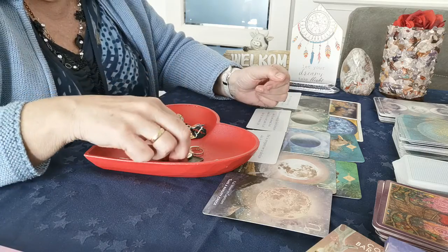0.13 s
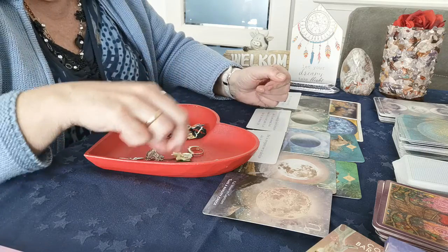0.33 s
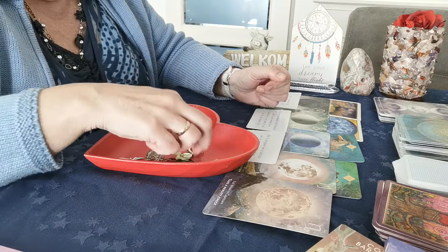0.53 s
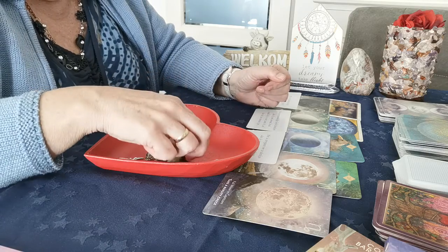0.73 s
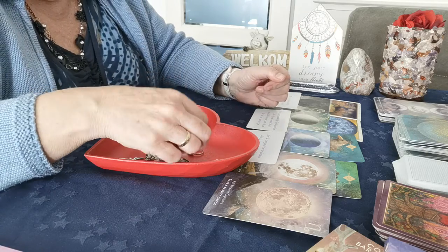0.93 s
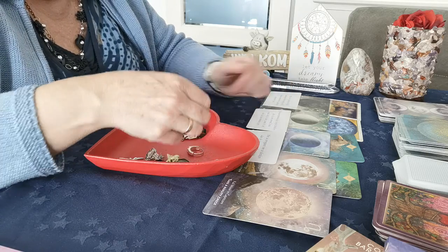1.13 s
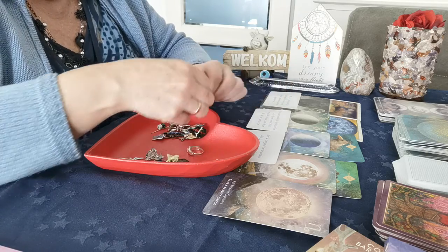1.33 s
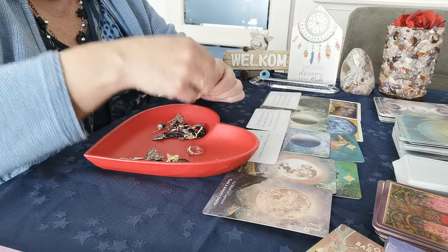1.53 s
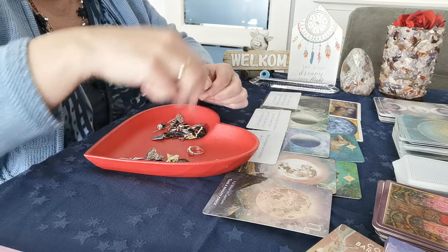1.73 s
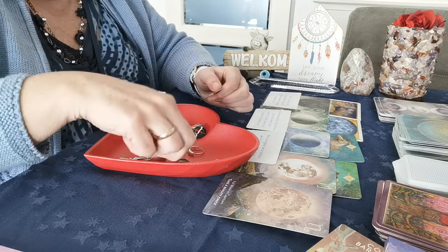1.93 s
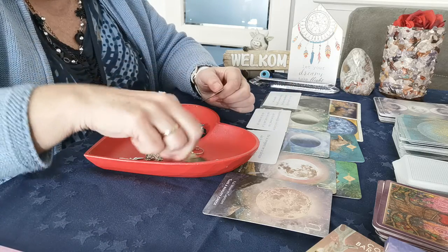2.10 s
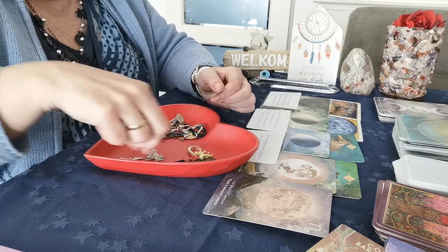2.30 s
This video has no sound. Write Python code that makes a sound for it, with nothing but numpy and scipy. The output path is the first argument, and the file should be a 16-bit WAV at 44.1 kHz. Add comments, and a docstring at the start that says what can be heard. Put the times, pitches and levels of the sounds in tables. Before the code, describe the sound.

Small metal charms clink and rattle in a shallow dish as fingers stir them, strongest around 0.2 to 0.4 seconds, with faint thuds from pressing the dish. Lighter clinks follow, ending in a brief ring at 1.2 seconds. A sleeve rubs softly around 1.5 seconds. From about 2.2 seconds the charms rattle again, louder. Quiet noise and a faint low hum fill the small room.

```python
"""Small metal charms clink and rattle as fingers stir them in a shallow dish on a cloth-covered table.
Each impact gives a damped knock on the dish, a crack of metal on metal and a brief ring of the charm's
modes; a push of the fingers sets off many impacts. The dish resonates and a small room reverberates.
Pressing on the dish makes soft thuds. The hand lifts away with a rub of the sleeve, then dips in again,
over quiet room noise and a low hum."""
import sys
import numpy as np
from scipy import signal
from scipy.fft import rfft, irfft
from scipy.io import wavfile

SR = 44100
rng = np.random.default_rng(int(sys.argv[2]) if len(sys.argv) > 2 else 0)


def to_wav(sig):
    """Store sig (one row per channel, or 1-D mono) as 16-bit WAV at the path in sys.argv[1].

    Samples outside -1..1 are clipped; the rate is SR.
    """
    pcm = np.clip(np.atleast_2d(sig), -1, 1) * 32767
    pcm = np.round(pcm).astype(np.int16)
    wavfile.write(sys.argv[1], SR, pcm.T)  # frames by channels


N = 104164
CHARM_HZ = 5950  # nominal pitch of a charm of middle size


def amp(db):
    """Amplitude ratio of a level in decibels."""
    return 10 ** (np.asarray(db) / 20)


def unit_rms(x):
    """Normalisation to a mean power of 1."""
    return x / np.sqrt(np.mean(x ** 2) + 1e-20)


def unit_energy(x):
    """Normalisation to an energy of 1, averaged over the channels."""
    return unit_rms(x) / np.sqrt(x.shape[-1])


def curve_at(points, hz):
    """Interpolation of (frequency, value) points on a logarithmic frequency axis."""
    f, value = np.transpose(points)
    return np.interp(np.log(hz + 1), np.log(f + 1), value)


def add(mix, start_s, sound):
    """Superposition of a stereo sound on the mix."""
    part = mix[:, max(round(start_s * SR), 0):][:, :sound.shape[1]]
    part += sound[:, :part.shape[1]]


def white_pair(size, correlation):
    """Partial coherence: two channels of white noise share a common part."""
    left, other = rng.standard_normal((2, size))
    return np.array([left, correlation * left + np.sqrt(1 - correlation ** 2) * other])


def noise(gain, correlation):
    """Spectral shaping: stereo noise of rms 1 whose amplitude spectrum follows gain(frequency)."""
    spectrum = rfft(white_pair(N, correlation)) * gain(np.fft.rfftfreq(N, 1 / SR))
    return unit_rms(irfft(spectrum, N))


def coloured(x, points, size=4096):
    """Minimum-phase filtering: the phase follows from the log gain by the Hilbert transform."""
    log_gain = np.log(amp(curve_at(points, abs(np.fft.fftfreq(size, 1 / SR)))))
    taps = np.fft.ifft(np.exp(np.conj(signal.hilbert(log_gain)))).real[:size // 2]
    return signal.oaconvolve(x, taps[None], axes=1)[:, :N]


def air(noise_db=-67, hum_hz=47.2, hum_db=-74):
    """Ambient noise: a continuous spectrum, strongest in the bass, plus one pure low hum."""
    # room noise spectrum: (frequency [Hz], relative spectral density [dB])
    spectrum = [(20, 0), (40, -13), (70, -8.5), (110, -10.5), (200, -13), (300, -16), (630, -20.5),
                (1000, -23.5), (2800, -28), (8500, -38), (10300, -52), (15000, -47)]
    hum = np.sqrt(2) * np.sin(2 * np.pi * (hum_hz * np.arange(N) / SR + rng.random()))
    return amp(noise_db) * noise(lambda f: amp(curve_at(spectrum, f)), correlation=0.21) + amp(hum_db) * hum


def sleeve():
    """Sliding friction: the sleeve makes a dull noise as the arm draws back over the table."""
    # swell and fade of the rub: (time [s], level [dB])
    swell = [(1.25, -74), (1.31, -70), (1.42, -66.5), (1.5, -62.5), (1.57, -64), (1.66, -71.5),
             (1.93, -77.5), (2.081, -92)]
    # spectrum of the rub: (frequency [Hz], relative level [dB])
    spectrum = [(100, -16), (190, -2.5), (230, -8), (295, 4), (400, -8), (480, -15), (750, -20),
                (1100, -21), (2500, -23), (6000, -30.5), (12000, -42)]
    times, db = np.transpose(swell)
    envelope = amp(np.interp(np.arange(N) / SR, times, db, left=-120, right=-120))
    return envelope * noise(lambda f: amp(curve_at(spectrum, f)), correlation=0.5)


def presses(thud_hz=128, thud_width_hz=80, hollow_hz=391, hollow_width_hz=37):
    """Resonance: fingers press the dish on the table, exciting a soft thud and a hollow low ring."""
    # finger presses: (time [s], twice the time until the decay begins [s], thud [dB], hollow ring [dB])
    bumps = [(0, 0.04, -74, -64.5), (0.244, 0.17, -65, -73.5), (0.324, 0.089, -72, -65),
             (0.42, 0.063, -74, -55.5), (0.532, 0.15, -66, -74), (0.787, 0.26, -72.5, -81),
             (1.065, 0.17, -67.5, -75.5), (1.216, 0.02462, -65, -85), (2.104, 0.038, -73, -65),
             (2.217, 0.15, -64, -68)]
    t, out = np.arange(N) / SR, np.zeros((2, N))
    thud = noise(lambda f: 1 / (1 + ((f - thud_hz) / thud_width_hz * 2) ** 2), correlation=1)
    hollow = noise(lambda f: 1 / np.hypot(1, (f - hollow_hz ** 2 / (f + 1)) / hollow_width_hz)
                   / (1 + (f / 900) ** 4), correlation=0.91)
    for start, length, thud_db, hollow_db in bumps:
        attack = np.clip((t - start) / 0.012, 0, 1)
        decay = amp(-260 * np.maximum(t - start - length / 2, 0))  # 260 dB per second
        out += attack * decay * (amp(thud_db) * thud + amp(hollow_db) * hollow)
    return out


def room(x, scatter_db=-6, scatter_s=0.0056, tail_db=-5, crossfade_s=.07):
    """Reflection: early scatter from hand, rim and table, then the room's diffuse reverberation."""
    # reverberation time of the room: (frequency [Hz], T60 [s])
    t60 = [(200, 0.78), (1300, 0.36), (3000, 0.44), (8000, 0.37), (14000, 0.27)]
    t, out = np.arange(SR // 2) / SR, x.copy()
    for k in range(3):  # three random responses crossfade in turn, so no steady tones ring out
        scatter = unit_energy(rng.standard_normal((2, len(t))) * (t > .0006) * np.exp(-t / scatter_s))
        hz, age, bands = signal.stft(white_pair(len(t), correlation=0.53), SR, nperseg=256)
        decay = amp(-60 * age / curve_at(t60, hz)[:, None])
        tail = signal.istft(bands * decay, SR, nperseg=256)[1][:, :len(t)]
        tail = unit_energy(tail * np.minimum(t / 0.012, 1))
        response = amp(scatter_db) * scatter + amp(tail_db) * tail
        turn = (np.arange(N) / SR / crossfade_s + k) % 3
        weight = np.sin(np.pi / 2 * np.minimum(turn, 2))
        out += signal.fftconvolve(x * weight, response, axes=1)[:, :N]
    return out


def dish(x):
    """Forced vibration: each impact drives the dish's modes, which ring on faintly."""
    # modes of the dish: (frequency [Hz], relative gain at resonance [dB], T60 [s])
    modes = [(1021, -23.5, .12), (1206, -27, 0.075), (1355, -25.5, 0.11), (1439, -22.5, 0.053),
             (1530, -27, 0.14), (2320, -24.5, 0.39), (2480, -25, 0.086), (2637, -28, .14),
             (2804, -24, 0.21), (3074, -17, .14)]
    t = np.arange(SR // 3) / SR
    ring = np.zeros(len(t))
    for hz, db, t60 in modes:
        envelope = amp(db - 60 * t / t60) * 220 / (t60 * SR)
        ring += envelope * np.sin(2 * np.pi * (hz * t + rng.random()))
    return x + signal.oaconvolve(x, ring[None], axes=1)[:, :N]


def impact(knock_db, knock_hz, decay_cycles, crack_db, ring_db, charm_hz, ring_s, size=9000):
    """Impact excitation: a damped knock on the dish, a metallic crack and the charm's free vibration."""
    # modes of a charm of middle size: (frequency [Hz], relative level [dB], T60 / ring time [ratio])
    charm_modes = [(5891, 0, 0.63), (6076, -6, .6), (6960, -5.5, 0.55), (8000, -3.5, 0.39),
                   (8700, -11, 0.22), (12740, -4.5, .6), (14370, -11, .5)]
    t = np.arange(size) / SR
    arrival_s = .00005 * abs(rng.standard_normal((2, 1)))
    cycles = knock_hz * np.maximum(t - arrival_s, 0)
    knock = unit_energy(cycles * np.exp(-cycles / decay_cycles) * np.sin(2 * np.pi * cycles))
    hz, db, share = np.transpose(charm_modes)[:, :, None]
    modes = amp(db - 60 * t / (share * ring_s)) * np.exp(2j * np.pi * hz * charm_hz / CHARM_HZ * t)
    phases = rng.random(len(modes)) + .19 * rng.standard_normal((2, len(modes)))  # per channel and mode
    rise = 1 - np.exp(-t / 0.0012)
    ring = unit_energy((np.exp(2j * np.pi * phases) @ modes).real * rise)
    highpass = signal.butter(2, 4200, "high", fs=SR)
    hiss = signal.lfilter(*highpass, white_pair(size, correlation=0.16))
    hiss = signal.lfilter([1, 1], [1], hiss)  # softens the top octave
    crack = unit_energy(hiss * rise * np.exp(-t / 0.001))
    span = np.sqrt(.003 * SR)  # unit energy becomes rms 1 over 3 ms
    pan = amp(1.5 * rng.standard_normal() * np.array([[1], [-1]]))
    return span * pan * (amp(knock_db) * knock + amp(crack_db) * crack + amp(ring_db) * ring)


def charms(impacts_per_s=650, fall_db=21):
    """Superposition of impacts: single clinks, and random rattles that swell and die with each push."""
    # single impacts, before colouring: (time [s], knock level [dB], knock pitch [Hz],
    # knock decay [cycles], crack level [dB], ring level [dB], charm pitch [Hz], ring time [s])
    clinks = [(0.028, -44.5, 1600, 1.5, -61, -43, 4380, 0.0134),
              (0.037, -37.5, 1620, 0.74, -65, -44, 5660, 0.0097),
              (0.2448, -35.5, 2000, 1.2, -32.5, -57, 5900, .015),
              (0.3036, -38, 1900, 0.46, -36, -35, 6050, 0.014),
              (0.3513, -35.5, 1840, 0.39, -36.5, -52, 6700, .015),
              (.362, -25, 2500, 0.48, -33, -32.5, 4150, 0.0089),
              (.371, -47, 2340, 0.43, -30.5, -48, 5930, 0.0105),
              (.407, -31, 1460, 0.39, -42, -34.5, 5700, 0.0196),
              (.526, -39.5, 2170, 0.46, -59, -57.5, 6000, .015),
              (.536, -39.5, 1910, 0.75, -64, -67, 5828, .015),
              (0.5637, -39.5, 2150, 0.48, -48.5, -50.5, 5400, 0.01982),
              (.569, -42, 1901, 0.233, -48, -53, 6710, 0.0096),
              (0.594, -43.5, 1700, 0.84, -57, -53.5, 5866, 0.016),
              (.7535, -42, 2244, 1.6, -55.5, -56, 4700, .01),
              (.777, -38.5, 2060, 1.7, -49, -59, 5870, 0.017),
              (0.7841, -38, 2040, 2, -42.5, -45.5, 6130, 0.021),
              (.857, -56.5, 2290, 1.04, -61, -51, 5760, .015),
              (0.9023, -38, 2095, 0.57, -59, -50, 5600, .015),
              (0.9339, -64, 2397, 0.78, -38, -33, 5740, 0.0253),
              (1.029, -42, 2360, 1, -55, -51, 4410, 0.022),
              (1.0544, -45, 2270, 0.45, -36, -36.5, 5940, 0.0052),
              (1.0805, -39, 1840, 0.35, -42, -46.5, 6200, .015),
              (1.089, -50, 1602, 0.45, -44, -44, 5740, 0.0127),
              (1.2264, -46, 2298, 0.73, -37.5, -38.5, 5970, 0.1),
              (1.2353, -40.5, 1738, 0.49, -47, -47, 7400, 0.01),
              (2.1143, -62, 1500, .7, -66, -74, 5600, 0.016),
              (2.193, -62, 2380, 0.32, -52.5, -56, 5762, .02),
              (2.217, -41.5, 2452, 0.62, -50, -50, 5530, 0.035),
              (2.223, -41.5, 1664, 0.57, -50, -58, 6090, .015),
              (2.234, -50, 1920, .8, -54, -55.5, 7000, 0.014),
              (2.238, -45, 1940, .8, -53, -45.5, 6853, .015),
              (2.2639, -28.5, 2100, 0.64, -24.5, -27.5, 5898, 0.0079),
              (2.2778, -27.5, 1801, 0.47, -51, -45.5, 5842, .015),
              (2.2818, -54, 2000, .7, -53, -32, 7450, 0.0078),
              (2.2877, -25, 1690, 0.83, -54, -36, 5570, 0.016),
              (2.2935, -34.5, 1460, 2.4, -45, -51, 6100, .015),
              (2.307, -53, 1530, 1.05, -42, -47, 6600, .015),
              (2.3166, -27, 1836, 0.63, -42, -41, 6120, 0.017),
              (2.328, -31, 1780, 0.52, -41, -36, 5840, .03)]
    # pushes through the heap: (time [s], rise [s], fall [s], relative knock level [dB],
    # median knock pitch [Hz], relative metal level [dB])
    rattles = [(0, 0.001, 0.096, -38.5, 2160, -46.5), (0.231, 0.0044, 0.032, -37, 2160, -36.5),
               (.244, 0.004767, 0.028, -33.5, 1940, -33.5), (0.259, 0.0041, 0.014, -44.5, 1550, -42.5),
               (.29, .04, 0.077, -43.5, 1960, -46.5), (.36, 0.051, 0.075, -35, 1852, -40.5),
               (.47, .06, .12, -49, 1830, -56), (0.586, .012, .045, -48, 1720, -59.5),
               (.745, 0.012, .025, -54.5, 2598, -61), (.772, 0.025, 0.049, -48.5, 2230, -43.5),
               (.83, .03, .06, -51.5, 1930, -54.5), (.875, 0.025, 0.051, -44, 1889, -46),
               (.955, .01, 0.042, -51.5, 2080, -51.5), (1.02, .01, .025, -46, 2530, -49.5),
               (1.06, 0.026, 0.073, -49, 2052, -50.5), (1.227, .008, 0.0082, -44, 2021, -40.5),
               (2.113, 0.0065, 0.063, -64, 1710, -63), (2.231, 0.0068, 0.062, -37, 1820, -41.5),
               (2.262, 0.045, 0.057, -35.5, 2020, -40.5), (2.32, 0.011, 0.065, -42, 2045, -38.5)]
    # colouring of all impacts: (frequency [Hz], gain [dB])
    colour = [(100, -10.5), (400, -8.5), (700, -12.5), (930, -2.5), (1100, -1.5), (1400, -6), (1900, -7.5),
              (2800, -1), (3400, -2), (4200, -1.5), (4900, -5.5), (5900, -4.5), (6800, -4.5), (8000, -1),
              (9200, -6.5), (10400, -18.5), (13000, -19.5), (15000, -20)]
    out = np.zeros((2, N))
    for start, *clink in clinks:
        add(out, start, impact(*clink))
    for start, rise, fall, knock_db, knock_hz, metal_db in rattles:
        for k in range(int((rise + fall) * impacts_per_s)):
            age = (k + rng.random()) / impacts_per_s
            force, brightness, knock_shift, charm_shift = np.clip(rng.standard_normal(4), -1.6, 1.6)
            swell_db = 20 * np.log10(min(age / rise, 1) + 1e-6) - fall_db * max(age - rise, 0) / fall
            strike_db = swell_db + 2.5 * (force - 1)
            bright_db = metal_db + strike_db + 2 * brightness - 3
            sound = impact(knock_db + strike_db, knock_hz * 2 ** (0.41 * knock_shift), decay_cycles=0.47,
                           crack_db=bright_db, ring_db=bright_db,
                           charm_hz=CHARM_HZ * 2 ** (.22 * charm_shift), ring_s=0.032, size=1600)
            add(out, start + age, sound)
    return coloured(out, colour)


def scene():
    """Linear superposition: the pressures of all sources add at the microphone."""
    return air() + presses() + sleeve() + room(dish(charms()))


def record(dry):
    """A level difference leans the image slightly right; a low-pass filter limits the bandwidth."""
    leaned = dry * amp([[-.5], [.5]])
    lowpass = signal.firwin(511, 15600, window=("kaiser", 9), fs=SR)
    return signal.oaconvolve(leaned, lowpass[None], "same")


dry = scene()
out = record(dry)
to_wav(out)
```